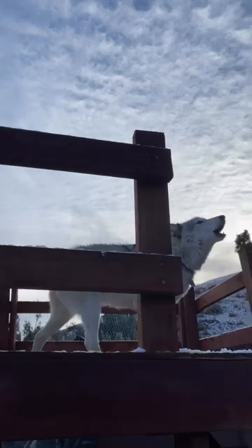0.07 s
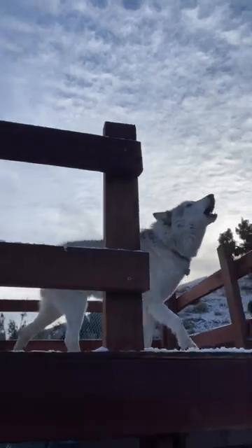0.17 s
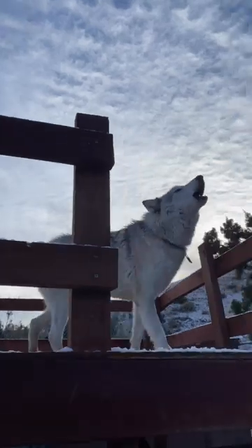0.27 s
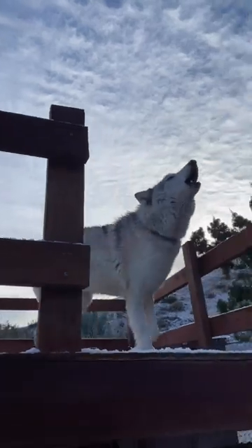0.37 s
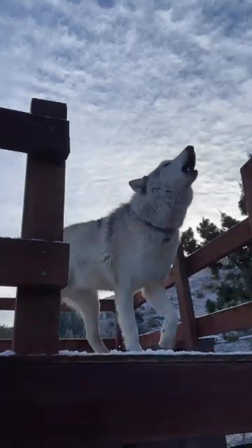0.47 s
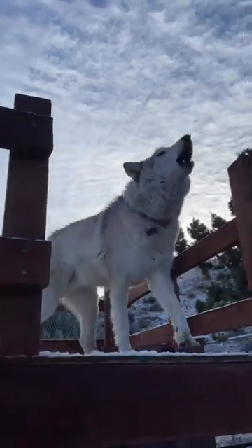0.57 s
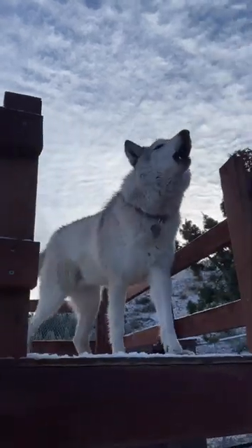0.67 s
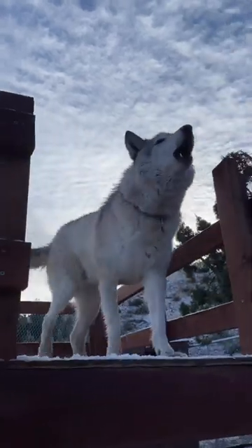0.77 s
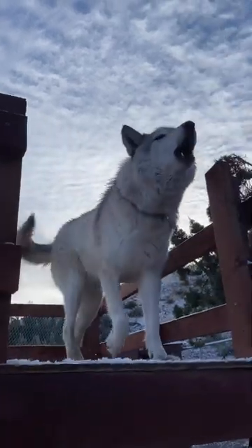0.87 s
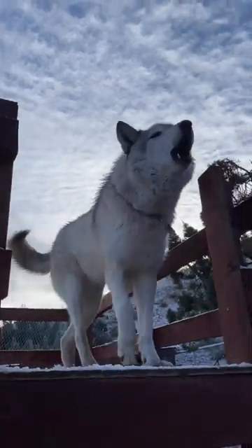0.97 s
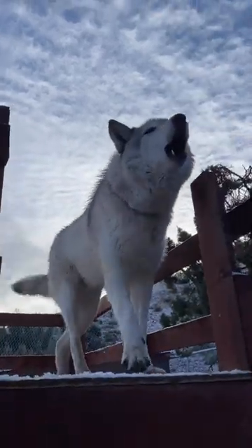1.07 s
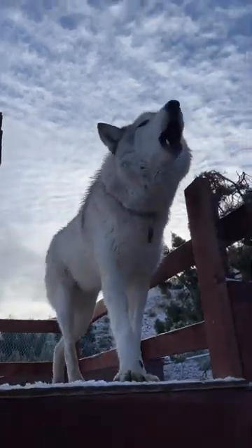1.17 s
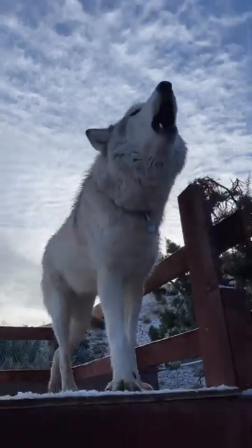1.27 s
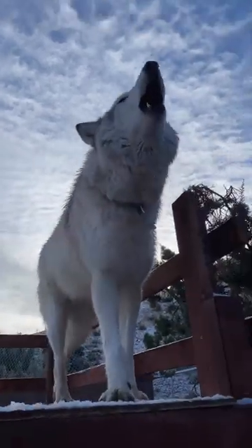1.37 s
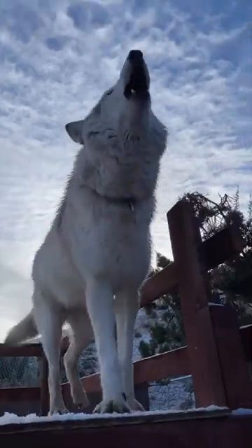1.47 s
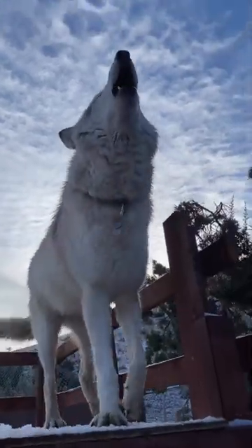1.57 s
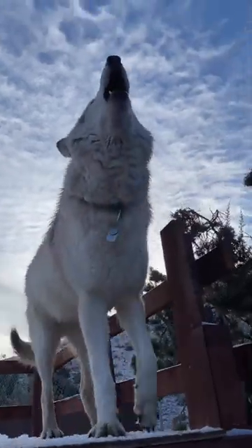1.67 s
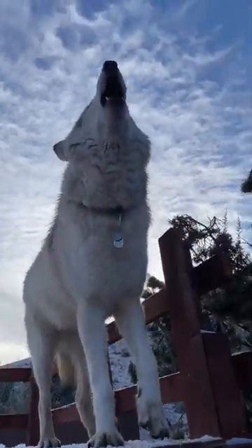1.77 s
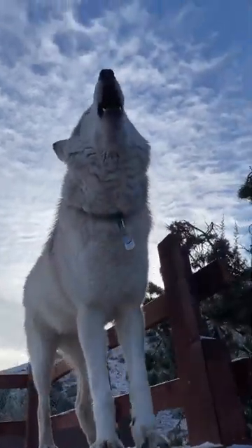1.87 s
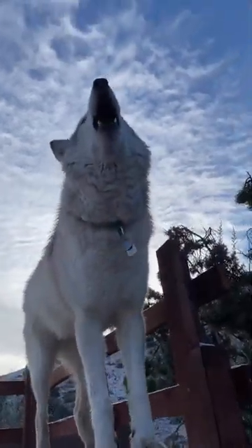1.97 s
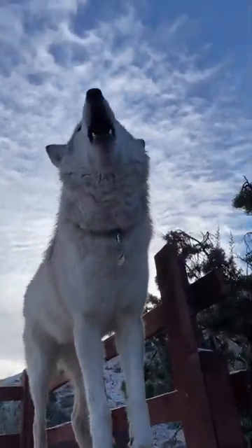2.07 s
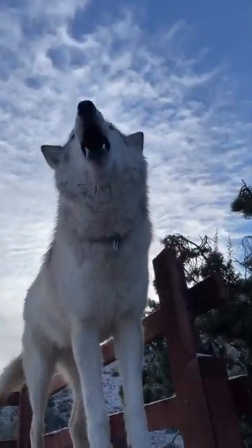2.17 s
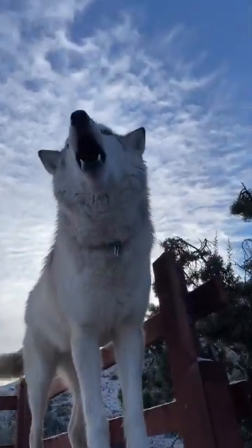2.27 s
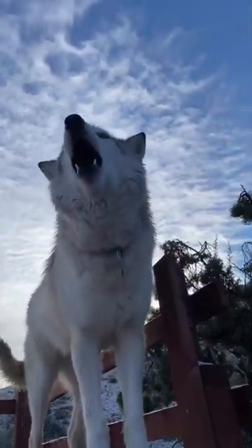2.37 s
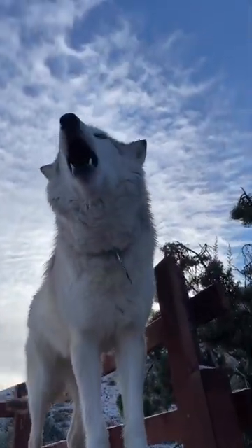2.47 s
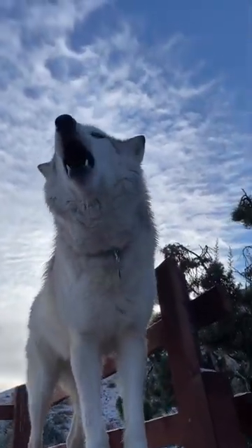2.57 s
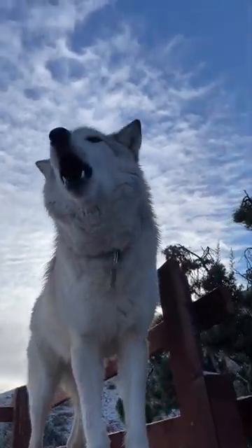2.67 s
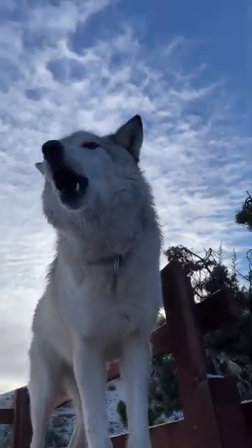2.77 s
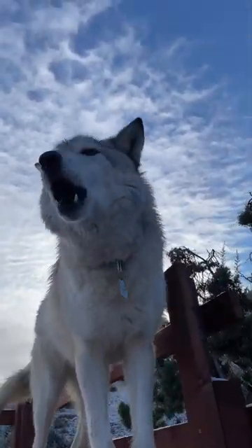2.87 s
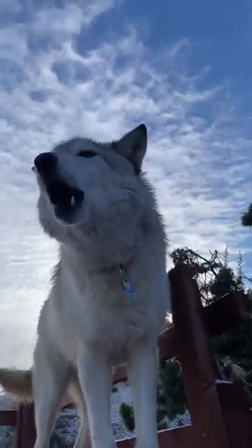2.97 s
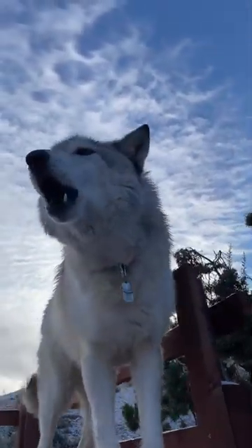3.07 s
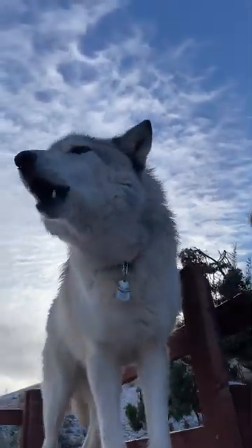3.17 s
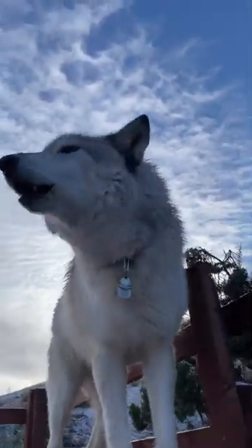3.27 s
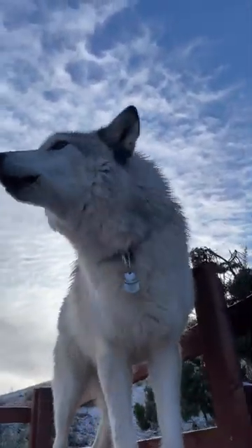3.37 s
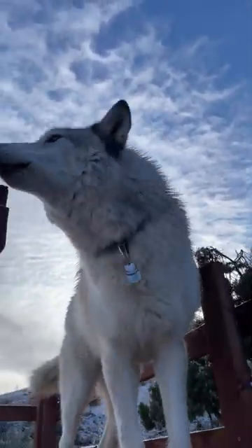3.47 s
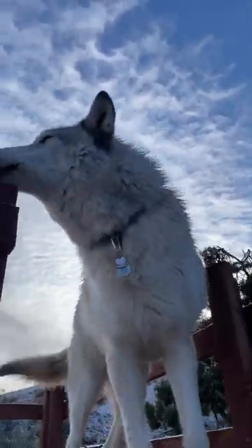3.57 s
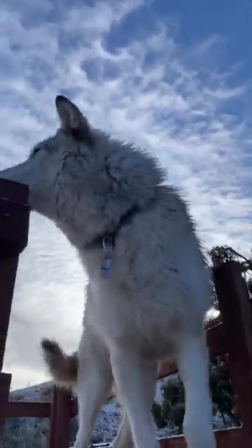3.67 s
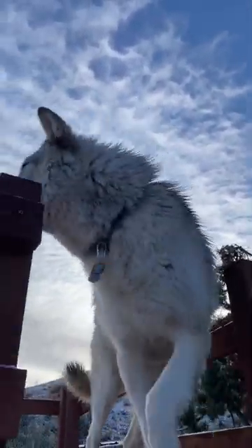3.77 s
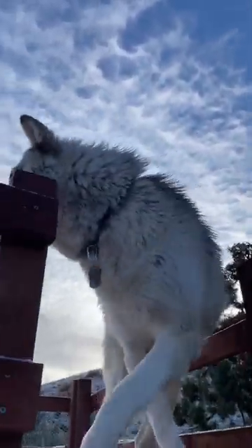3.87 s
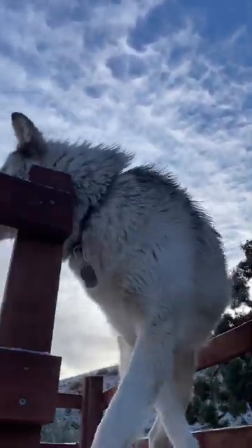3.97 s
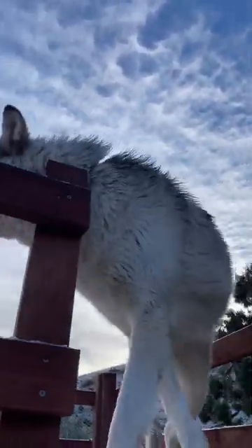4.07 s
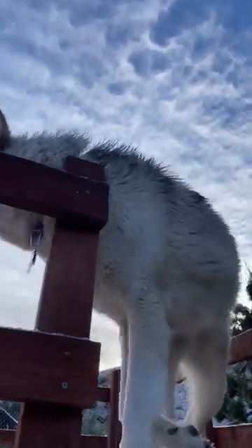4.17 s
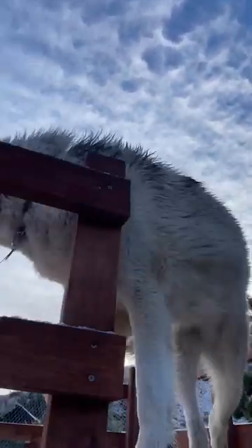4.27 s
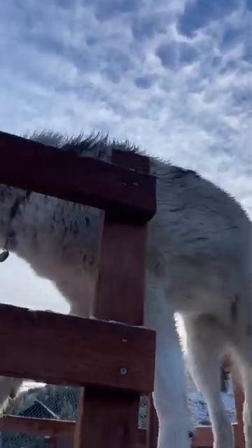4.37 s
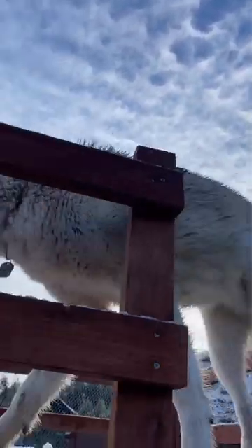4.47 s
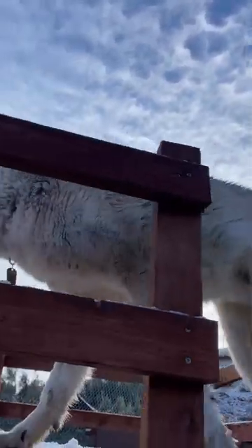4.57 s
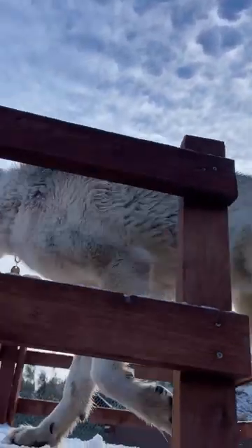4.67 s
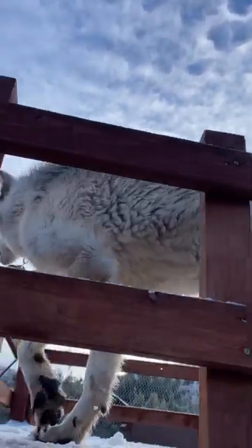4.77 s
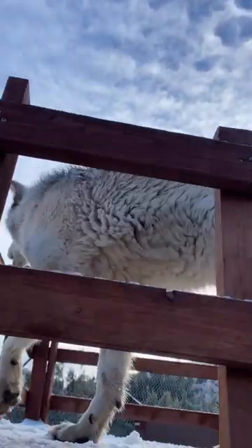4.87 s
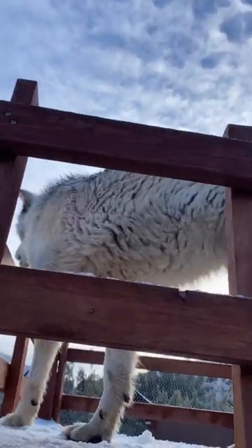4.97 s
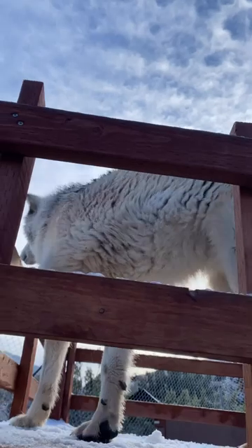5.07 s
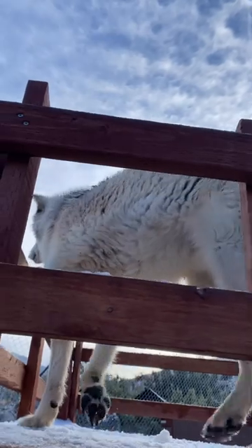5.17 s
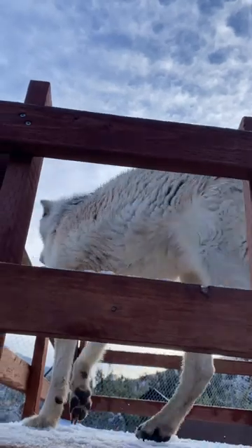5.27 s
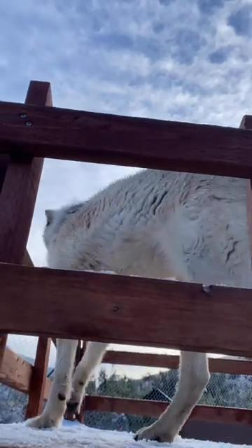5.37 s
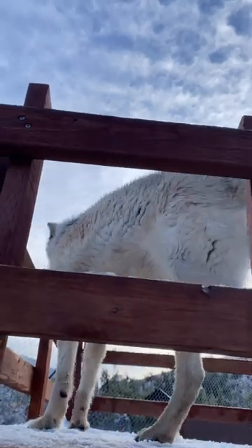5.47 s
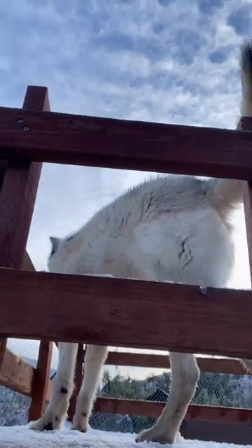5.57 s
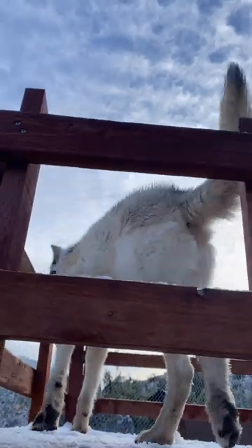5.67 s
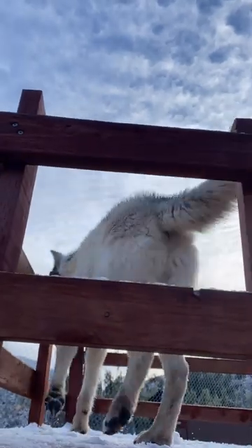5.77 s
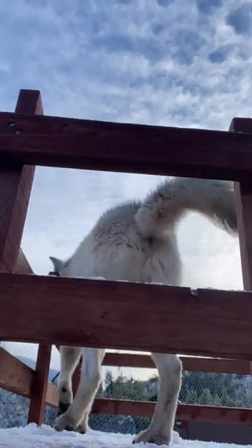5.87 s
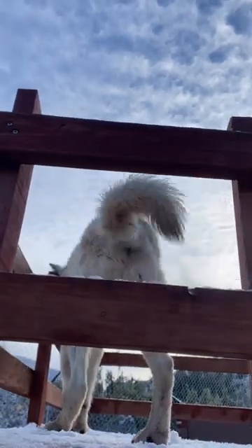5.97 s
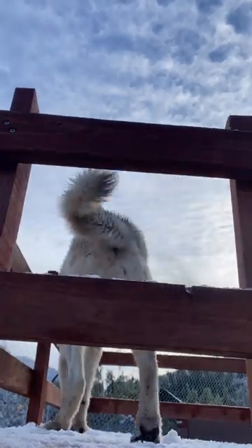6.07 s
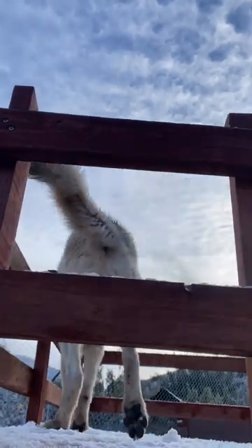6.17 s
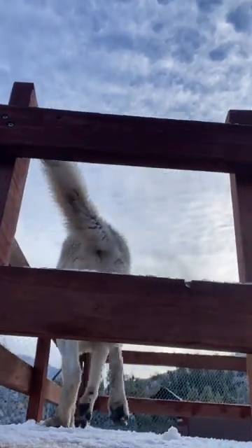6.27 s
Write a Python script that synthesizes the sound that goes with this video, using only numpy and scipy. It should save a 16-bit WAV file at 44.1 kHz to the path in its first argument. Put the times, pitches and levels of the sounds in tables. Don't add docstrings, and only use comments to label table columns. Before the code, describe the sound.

Outdoors in snow, a near wolf's full, ringing howl starts abruptly with a quick upward scoop and holds steady, breathy at the edges, over farther howls to the left. It sinks and thins out, leaving low wavering tones, light paw steps on a wooden deck and crisp snow. Then higher howls from the pack overlap and clash, growing to the cut-off. Handheld stereo pickup, very little echo, faint low wind.

```python
import sys
import numpy as np
from scipy import signal
from scipy.fft import rfft, irfft
from scipy.io import wavfile
from scipy.ndimage import uniform_filter1d

SR = 44100
rng = np.random.default_rng(int(sys.argv[2]) if len(sys.argv) > 2 else 0)


def unload_audio(sound):
    columns = np.transpose(np.atleast_2d(sound))
    steps = np.round(np.clip(columns, -1, 1) * 32767)
    wavfile.write(sys.argv[1], SR, steps.astype(np.int16))


def gain_from_decibels(decibels):
    exponent = np.asarray(decibels, float) / 20
    return 10 ** exponent


N = 279153
START_S = 0.151
PORT_LEAD_S = 6e-05


def in_time(rows, fade=0.0055):
    s, *columns = np.transpose(rows)
    first = int((s[0] - fade) * SR)
    t = np.arange(first, min(int((s[-1] + fade) * SR), N)) / SR
    end = s[-1] + fade if s[-1] < N / SR - 0.01 else np.inf
    gate = np.clip(np.minimum(t - t[0], end - t) / (2 * fade), 0, 1)
    return first, gate, [np.interp(t, s, c) for c in columns]


def follow(rows, t):
    return np.interp(t, *np.transpose(rows))


def at_hz(points, hz):
    p = np.array(points, float)
    return np.interp(np.log(hz), np.log(np.maximum(p[:, 0], 20)), p[:, 1])


def resonance(hz, centre_hz, width):
    return np.exp(-(np.log(hz / centre_hz) / width) ** 2)


def drift(rate, size=N):
    r = np.exp(-80 * np.pi * rate / SR)
    steps = rng.standard_normal(N // 40 + 2002)
    slow = signal.lfilter([1], [1, -2 * r, r * r], steps)[2000:]
    return np.interp(np.arange(size) / 40, np.arange(len(slow)), slow / slow.std())


def coloured(points, alike, lead_s=0):
    mid, side = rfft(rng.standard_normal((2, N)))
    hz = np.arange(len(mid)) * SR / N
    gain = gain_from_decibels(at_hz(points, np.maximum(hz, 1)))
    own = 1 - np.clip(alike, 0, 1)
    lead = np.exp(2j * np.pi * hz * lead_s)
    out = irfft(gain * np.array([lead * (mid + own * side), mid - own * side]), N)
    return out / out.std()


def patchy(x, depth_db, bins=3, frames=24):
    spectra = signal.stft(x, nperseg=1024)[2]
    field = rng.standard_normal(spectra.shape[1:])
    for width, axis in ((bins, 0), (frames, 1), (frames, 1)):
        field = uniform_filter1d(field, max(int(width), 1), axis=axis)
    gain = gain_from_decibels(depth_db * field / field.std())
    out = signal.istft(spectra * gain, nperseg=1024)[1][:, :N]
    return out / out.std()


def add(out, at, phase, level_db, pan_db, lead):
    height = np.sqrt(2) * gain_from_decibels(level_db)
    out[0, at:at + len(phase)] += height * 2 / (1 + gain_from_decibels(-pan_db)) * np.sin(phase + lead / 2)
    out[1, at:at + len(phase)] += height * 2 / (1 + gain_from_decibels(pan_db)) * np.sin(phase - lead / 2)


# time_s, pitch_hz, effort_db, jaw_db, lip_rounding_percent
HOLD = [(0.33, 384.2, -9.5, -1.5, -0.5), (0.46, 383.2, -9, 0.5, -0.5), (.6, 384.6, -9.5, 1.5, -0.5),
        (0.728, 383.6, -9, 3.5, -2), (0.861, 379.8, -8.5, -3.5, 0), (1, 382, -10.5, 0, 0),
        (1.14, 377.6, -12, 0.5, 0.1), (1.334, 380.6, -16, 5.5, 0), (1.562, 384.7, -12.5, 0.5, 0),
        (1.72, 388.3, -11.5, -3, 0), (1.9, 384.7, -11.5, 1.5, -0.5), (2.1, 382.3, -11, 1, 0.5),
        (2.36, 385.6, -10, -2, 3), (2.6, 382.9, -11.5, -4, 2), (2.801, 378.3, -15, -4.5, 1),
        (3.1, 370.9, -14, -2.5, -0.26)]
DROP = [(3.101, 368.2, -15, -2.5, 0.2), (3.2, 358.3, -16, -5, 0.22), (3.27, 339.7, -19.5, 1.5, 0.33),
        (3.37, 280.6, -28.5, 3.5, 0.28), (3.477, 246.5, -30.5, -9.5, 0.28), (3.54, 235.5, -38.5, -1, 0.44),
        (3.602, 247.3, -35.5, -8, 0.21), (3.66, 263.8, -34, -15.5, 0.23), (3.735, 259.6, -34.5, -0.5, 0.36)]
WAVER = [(3.79, 255.6, -39.5, -1, 0.3), (3.859, 245.5, -36.5, -10.5, 0.3), (3.95, 249.5, -35, -13, .27),
         (4.03, 253.6, -37, -17.5, 0.27), (4.081, 261.2, -37.5, -16, 0.22),
         (4.124, 280.5, -41, -15.5, 0.28), (4.15, 306.3, -43, -12, .28)]
STEP = [(4.15, 306.8, -48, -13, .28), (4.162, 343.5, -40.5, -15, 0.27), (4.206, 353.9, -39.5, -9, .3),
        (4.268, 348.8, -43, -15, .3), (4.31, 386.3, -45.5, -10, .3), (4.35, 405.5, -40.5, -11, .3),
        (4.4, 401, -44, -11, .3), (4.453, 393.5, -45.5, -14, 0.34), (4.511, 356.4, -67.5, -12, 0.22)]
RISE = [(4.961, 381.5, -56, -7, .3), (4.976, 369.1, -48, -17, .3), (5.0, 351.8, -48.5, -14, 0.32),
        (5.05, 344.5, -46.5, -20, .3), (5.104, 326.5, -51, -17, .3), (5.241, 347.1, -56, -15, .3),
        (5.321, 363.8, -53.5, -9, .3), (5.386, 392.2, -45.5, -8.5, 0.26), (5.522, 414.4, -43.5, -1, 0.24)]
CREST = [(5.522, 421, -40.5, -5, .27), (5.62, 462, -36.5, -1.5, .3), (5.684, 483.8, -34.5, -4.5, .3),
         (5.73, 517.4, -32.5, -5.5, 0.34), (5.78, 517.3, -32, -7.5, .3), (5.851, 498.2, -40, 4.5, .3),
         (5.946, 468.2, -37.5, -2, .28), (5.98, 472, -46, 3, .3), (6.043, 488, -42.5, 9.5, .3)]
LAST = [(6.04, 474.5, -39, -5, 0.24), (6.082, 460, -44, 7, .3), (6.33, 443.4, -44, 10, 0.7)]
# freq_hz, level_db
MOUTH_WIDE = [(380, 0), (710, -5.5), (790, -34.5), (1065, -33), (1135, -19.5), (1160, -17), (1515, -14),
              (1550, -17.5)]
MOUTH_CLOSING = [(240, -6), (285, 2.5), (360, 8), (500, -5), (570, -8.5), (700, -7), (800, -10.5),
                 (1000, -20.5)]
MOUTH_SHUT = [(245, -14.5), (265, -3.5), (350, 5), (500, -1.5), (700, 3), (800, -4), (1000, 2.5)]
MOUTH_AWAY = [(340, 5), (500, -1.5), (700, 0.5), (1000, -5.5), (1300, -7.5), (1500, -5), (1900, -16)]
# freq_hz, level_db
THROAT_WIDE = [(1550, 1.5), (1950, -7), (2300, -15), (2700, -34.5), (3070, -56), (3450, -40.5), (4200, -49),
               (4950, -52.5), (5400, -43.5), (6200, -40), (7000, -45), (7600, -68.5), (8800, -55.5),
               (9600, -77), (11000, -54), (15000, -63.5)]
THROAT_CLOSING = [(1000, 5), (1280, -2.5), (1500, -18), (1850, -7), (2050, 4.5), (2300, -24.5),
                  (3000, -77.5)]
THROAT_SHUT = [(1000, 18.5), (1300, 11.5), (1600, 1), (2000, -1), (2350, -8.5), (2900, -46), (3200, -60),
               (4000, -62)]
THROAT_AWAY = [(1900, 11.5), (2350, -4), (2600, -11), (2900, -18), (3200, -37)]
POSTURE_S = [3.24, 3.36, 3.58, 3.68, 4.7, 4.8]
# time_s, level_db
NOSE = [(.3, 0), (2.2, -.5), (2.4, -2), (2.62, -1), (2.8, 5), (3.0, 0.5), (3.15, -0.5), (3.35, 0),
        (3.6, 0.5)]
TONGUE = [(.15, 2), (.42, -8.5), (.58, -0.5), (.75, -4), (.95, -7), (1.2, -4), (1.45, 3.5), (2.0, -3.5),
          (2.6, 0.5), (2.9, 3.5), (3.12, 2.5), (3.24, -5), (3.33, 12), (3.48, 16.5), (3.56, -19),
          (3.66, -2.5), (5.76, 2), (5.87, 7), (5.97, 8)]
CHEEKS = [(.3, 0), (.5, 0.5), (.8, -4), (1.05, 4), (1.33, -3), (1.45, 1.5), (1.75, 3.5), (1.9, -3),
          (3.2, 0), (3.42, -3), (3.62, -21), (3.75, 6.5), (5.6, -5), (5.75, 7.5), (5.87, 2.5), (5.97, -6)]
PALATE = [(3.2, -2.5), (3.27, 11.5), (3.32, -3), (3.38, 10.5), (3.5, 10), (3.62, 0)]
# time_s, towards_left_db
HEAD = [(.15, 0), (.9, -1.2), (1.3, 0), (1.5, -0.5), (2.5, -1.05), (3.2, -0.1), (3.7, .8), (6.3, -0.2)]
# freq_hz, left_minus_right_db
NEAR_PAN = [(60, 0.0), (110, 0.0), (210, 1), (390, 2.5), (740, 5.5), (1390, 3), (2600, -2)]
# freq_hz, lead_rad
NEAR_PHASE = [(0, 0.2), (860, 0.22), (2300, 0.32), (4000, 1.5), (7000, 0.63)]


def near_wolf(count=24, jitter_hz=0.39, shimmer_db=0.16, sway_db=1.34, high_shimmer_db=4.5):
    scoop_s, scoop_hz, overshoot_hz = 0.065, 33.25, 4.7
    swell_db, start_shut_db, shut_db = 8, 23, 16
    glide_s = 0.02
    jaw_from_hz, jaw_full_hz = 580, 1490
    lip_hz, cheek_hz, lip_width = 1875, 1530, 0.026
    lip_db, cheek_db = 8, 0.7
    nasal_top_hz = 915
    even_db, even_s = 13, 0.1
    rise_rough = 1.2
    pause_db = 23.5
    tracts = [(MOUTH_WIDE, THROAT_WIDE), (MOUTH_CLOSING, THROAT_CLOSING),
              (MOUTH_SHUT, THROAT_SHUT), (MOUTH_AWAY, THROAT_AWAY)]
    cavities = [(NOSE, 830, 0.12), (TONGUE, 1100, 0.11), (CHEEKS, 1520, 0.06), (PALATE, 1954, 0.02)]

    out, turns = np.zeros((2, N)), rng.uniform(0, 2 * np.pi, count + 1)
    _, held_hz, held_db, jaw, lips = HOLD[0]
    attack = [(START_S, held_hz - scoop_hz, held_db - swell_db, jaw - start_shut_db, -lips),
              (START_S + scoop_s, held_hz + overshoot_hz, held_db - swell_db, jaw - shut_db, lips)]
    howl = attack + HOLD
    phrases = [howl, DROP, DROP[-1:] + WAVER, STEP, RISE, CREST, LAST]
    s, pitch, effort, opening, _ = np.transpose(sum(phrases, []))
    t = np.arange(N) / SR
    glided_hz = uniform_filter1d(np.interp(t, s, pitch), max(int(glide_s * SR), 1))
    cycle = 2 * np.pi * np.cumsum(glided_hz + jitter_hz * drift(67)) / SR
    posture = np.interp(t, POSTURE_S, [0, 1, 1, 2, 2, 3])

    for rows in phrases:
        at, gate, (hz, effort_db, jaw_db, rounding) = in_time(rows, fade=0.0076)
        gate_db = 20 * np.log10(gate + 1e-5)
        size, now = len(hz), t[at:at + len(hz)]
        shares = [(np.clip(1 - abs(posture[at:at + size] - i), 0, 1), *tract)
                  for i, tract in enumerate(tracts)]
        shares = [part for part in shares if part[0].any()]
        rising = rows is RISE or rows is CREST
        curves = [(follow(curve, now), centre_hz, width) for curve, centre_hz, width in cavities]
        head_db = follow(HEAD, now)
        top_hz = max(throat[-1][0] for _, _, throat in shares)
        for k in range(1, min(count, int(top_hz / hz.min())) + 1):
            mean_hz = k * hz.mean()
            wobble = drift(25, size) * shimmer_db
            if k > 1:
                rough = 1
                if rising:
                    rough = 1 + rise_rough if k < 7 else 0.5
                depth_db = high_shimmer_db if k >= 7 and rows is howl else sway_db
                wobble = wobble + drift(14.0 if rising else 2.5, size) * rough * depth_db
            seen_hz = k * hz * (1 + (mean_hz < nasal_top_hz) * rounding / 100)
            tract_db = sum(share * (at_hz(mouth, seen_hz) + at_hz(throat, seen_hz) - throat[0][1])
                           for share, mouth, throat in shares)
            lifted = np.clip(np.log(k * hz / jaw_from_hz) / np.log(jaw_full_hz / jaw_from_hz), 0, 1)
            ring_db = lip_db * rounding * resonance(k * hz, lip_hz, lip_width)
            ring_db = ring_db + cheek_db * rounding * resonance(k * hz, cheek_hz, lip_width)
            cavity_db = sum(db * resonance(k * hz, centre_hz, width) for db, centre_hz, width in curves
                            if 0.7 < mean_hz / centre_hz < 1.4)
            onset_db = 0
            if k % 2 == 0 and k < 8:
                onset_db = lifted * k / 4 * even_db * np.exp(-(now - START_S) / even_s)
            level_db = effort_db + lifted * jaw_db + ring_db + tract_db + onset_db + cavity_db
            add(out, at, k * cycle[at:at + size] + turns[k], level_db + wobble + gate_db,
                at_hz(NEAR_PAN, mean_hz) + head_db, at_hz(NEAR_PHASE, mean_hz))
    pause = (t > STEP[-1][0]) & (t < RISE[0][0])
    return out, cycle, np.interp(t, s, effort + opening) - pause_db * pause


# freq_hz, level_db_per_hz
HISS = [(1900, -58), (2700, 4.5), (3400, -4.5), (4300, -5.5), (5400, -5.5), (6600, -3), (7500, -7),
        (8600, -19), (9600, -30), (10800, -17.5), (14000, -20), (15500, -42.5)]
# freq_hz, level_db_per_hz
HUSK = [(120, -61.5), (300, -18), (450, -0.5), (680, 3), (950, -16.5), (1400, -5), (1800, -10), (2300, -11),
        (2800, -14.5), (3050, -36)]
# time_s, level_db
HOARSE = [(.15, -1.5), (.7, -4), (1.2, 0), (1.6, -2.5), (1.8, -6.5), (2.4, -3), (2.999, -4), (3.3, 0),
          (4.0, -5), (5.3, -8.5), (6.3, -3.5)]


def breath(cycle, blow_db, gating=0.33):
    hiss_db, hiss_follows = -47, 0.34
    husk_db, husk_follows = -38.5, 0.29
    closed_clear_db = 7
    t = np.arange(N) / SR
    hiss = patchy(coloured(HISS, alike=0.59, lead_s=PORT_LEAD_S), depth_db=4.5)
    husk = patchy(coloured(HUSK, alike=0.56), depth_db=5.5)
    blow_db = blow_db - 2 * closed_clear_db * np.interp(t, POSTURE_S[:2], [0, 1])
    air = gain_from_decibels(hiss_db + hiss_follows * blow_db) * hiss
    air = air + gain_from_decibels(husk_db + husk_follows * blow_db + follow(HOARSE, t)) * husk
    puffs = air * (1 + np.clip(gating, 0, 1) * np.cos(cycle))
    return signal.sosfilt(signal.butter(4, 260, "high", fs=SR, output="sos"), puffs)


# time_s, pitch_hz, level_db
SECOND = [(0.15, 346.2, -20.5), (0.26, 354.4, -19), (0.36, 346, -21), (0.9, 346.4, -27),
          (1.6, 330.6, -34.5), (2.4, 324.5, -37.5), (3.1, 311.5, -43), (3.56, 292.2, -41), (3.74, 282, -48)]
PUP = [(0.17, 870, -56), (0.24, 882, -35), (0.36, 832, -40.5), (0.6, 843, -53), (0.75, 794, -42.5),
       (1.15, 800, -54.5)]
FAR_LOW = [(0.25, 227, -55.5), (0.85, 230.8, -44.5), (1.3, 225.6, -57)]
MOAN = [(3.7, 176, -60), (3.802, 168, -55), (4.944, 168.5, -52), (5.008, 171.4, -56), (5.07, 192, -65)]
YODEL = [(3.94, 563, -51), (4.1, 577, -44), (4.44, 618, -34.5), (4.76, 595, -37), (5.16, 577.4, -46.5),
         (5.32, 579, -45), (5.56, 594, -38.5), (5.95, 593, -36), (6.33, 585, -32)]
HIGH = [(5.326, 658, -37.5), (5.345, 673, -40.5), (5.5, 712.7, -40.5), (5.7, 713, -43.5),
        (5.88, 707.7, -38.5), (6.02, 684, -34.5), (6.12, 709.5, -36), (6.33, 712, -37)]
GROWL = [(5.87, 126, -56), (5.93, 139.7, -50), (5.97, 162.6, -41), (6.005, 200, -40.5), (6.04, 262.6, -40)]
BREAK = [(6.035, 380.9, -23), (6.096, 462.8, -22), (6.33, 467.6, -19.5)]
# time_s, pitch_hz, level_db
WHINES = [
    [(5.08, 386.9, -74), (5.24, 429.3, -62), (5.38, 434.0, -58)],
    [(5.38, 850, -61), (5.46, 1063.9, -48), (5.52, 1138, -50), (5.6, 1085, -52), (5.68, 965.6, -55),
     (5.76, 770, -52)],
    [(4.5, 442, -108), (4.65, 415, -62), (4.85, 373.3, -63)],
    [(5.88, 1190, -61), (6.0, 1160, -58), (6.15, 1140, -62), (6.33, 1150, -63)],
]
# time_s, pitch_hz, level_db
DRONES = [
    [(.55, 112.8, -67.5), (.9, 115.3, -59), (1.3, 114.2, -67.5)],
    [(1.4, 133.9, -71), (1.9, 134, -69), (2.2, 133, -69)],
]
# phrase, partials_db, left_minus_right_db, left_lead_s
PACK = [(SECOND, [0.5, -20, -28, -40], 2.3, 0.00033), (PUP, [0], 9.9, 0.00013),
         (FAR_LOW, [-6.5, -1.5, -9, 2], 4.3, 0.00029),
        (MOAN, [-1, 6, -13.5, -21, -11, -29.5, -34, -26, -37, -34, -37, -28.5, -43.5, -30.5, -37.5, -24],
        4.4, 0.0002), (YODEL, [0, -41, -42.5], 7.3, 0.00014), (HIGH, [3, -18.5, -37, -39.5, -40, -25.5],
        9.4, 0.00034), (WHINES[0], [0, -10, -11], 6.6, .0001), (WHINES[1], [0], 4.55, .0001), (WHINES[2],
        [0, -32, -15], 4.0, .0001), (WHINES[3], [0], 4.0, .0001), (GROWL, [-5.5, 5, -5, -18, -32],
        4.9, 0.00011), (BREAK, [-3, -23, -34, -41, -44, -45], 9.4, 0.000086)]
# start_s, length_s, jump_hz
FLIPS = [
    (5.679, .04, 37.3),
    (5.818, .04, 47.9),
    (5.97, .5, 84.2),
]


def pack(jitter=0.0015, shimmer_db=0.9, high_shimmer_db=4.0):
    flip_edge_s = 0.015
    turn_s, facing_s, turn_db_per_s = 5.68, 0.19, 87
    beam_hz = 3004
    opening_db_per_s = 3
    settle_s, settle_db = 0.12, 5
    rasp_db, rasp_per_s, rasp_jitter = 5, 45, 0.012
    out = np.zeros((2, N))
    for rows, partials_db, pan_db, lead_s in PACK + [(drone, [0], 2.5, 0) for drone in DRONES]:
        at, gate, (hz, level_db) = in_time(rows)
        size = len(hz)
        t = (at + np.arange(size)) / SR
        hoarse = rows == WHINES[1]
        if rows == YODEL:
            for s, length_s, jump_hz in FLIPS:
                inside_s = np.minimum(t - s, s + length_s - t)
                hz = hz + jump_hz * np.clip(inside_s / flip_edge_s + 0.5, 0, 1)
        unsteady = (rasp_jitter if hoarse else jitter) * drift(30, size)
        phase = 2 * np.pi * np.cumsum(hz * (1 + unsteady)) / SR
        level_db = level_db + 20 * np.log10(gate + 1e-4)
        if hoarse:
            level_db = level_db - 4.0 + rasp_db * drift(rasp_per_s, size)
        for k, db in enumerate(partials_db, 1):
            if k * hz.mean() > beam_hz:
                db = db - turn_db_per_s * np.maximum(abs(t - turn_s) - facing_s, 0)
                db = db + high_shimmer_db * drift(15, size)
            if rows == SECOND and k == 3:
                db = db + opening_db_per_s * (t - t[0])
            if rows == BREAK and k > 1:
                db = db - settle_db * np.clip(1 - (t - t[0]) / settle_s, 0, 1)
            add(out, at, k * phase + k * k, level_db + db + shimmer_db * drift(18.0, size),
                pan_db, 2 * np.pi * k * hz * lead_s)
    return out


# freq_hz, level_db_per_hz
WIND = [(200, 0), (500, -0.5), (900, -7), (1500, -15), (2500, -27.5), (5000, -19.5), (8500, -24.5),
        (14000, -41.5)]
# time_s, level_db
RUMBLE = [(0.15, -53), (0.3, -52), (1.2, -58.5), (1.9, -75.5), (2.46, -73), (2.64, -63), (3.6, -69.5),
          (6.23, -65), (6.33, -67)]


def wind():
    at, gate, (gust_db,) = in_time(RUMBLE)
    gust = np.zeros(N)
    gust[at:at + len(gate)] = gain_from_decibels(gust_db - 1.0)
    lump_spectrum = [(22, -30), (45, -0.5), (70, -9.5), (130, -2.5), (220, -13), (400, -34.5), (900, -83.5)]
    lumps = coloured(lump_spectrum, alike=0.46) * gain_from_decibels(np.array([[0.7], [-0.7]]))
    gusts = gust * gain_from_decibels(1.5 * drift(2.2) + 2.5 * drift(7.3)) * lumps
    floor = patchy(coloured(WIND, alike=0.55, lead_s=PORT_LEAD_S), depth_db=5.5)
    return gusts + gain_from_decibels(-63.5) * floor * gain_from_decibels(1.5 * drift(1.6))


# time_s, pitch_hz, level_db
WHISTLES = [
    [(.155, 4170, -58.5), (.21, 4220, -56), (.28, 4290, -55.5), (.34, 4270, -85.5)],
    [(5.66, 5330, -82), (5.78, 5200, -63.5), (5.89, 5263, -63), (5.96, 5370, -67), (6.04, 5240, -73.5),
     (6.2, 5310, -76.5)],
]
WHISTLE_SIDES_DB = [-4, 3.5, 4.5, -1]


def whistles(flutter_db=3.0, wander_hz=9.3, beat_hz=507):
    out = np.zeros((2, N))
    for rows, sides_db in zip(WHISTLES, ([-40, 0], WHISTLE_SIDES_DB)):
        at, gate, (hz, level_db) = in_time(rows)
        gate_db = 20 * np.log10(gate + 1e-4)
        for k, db in enumerate(sides_db, -1):
            tone_hz = hz + k * beat_hz + wander_hz * drift(18, len(hz))
            phase = 2 * np.pi * np.cumsum(tone_hz) / SR
            tone_db = level_db + db + flutter_db * drift(25, len(hz)) + gate_db
            add(out, at, phase, tone_db, 1.0, 2 * np.pi * tone_hz * PORT_LEAD_S)
    return out


# start_s, peak_db
THUDS = [(.445, -51), (1.039, -50.5), (1.355, -57), (1.587, -57), (2.559, -58), (2.695, -61), (3.231, -54),
         (3.57, -52), (3.95, -53), (4.183, -49), (4.464, -53), (4.721, -54.5), (4.847, -48), (5.087, -54),
         (5.3, -51), (5.421, -57), (5.622, -43), (5.956, -55), (6.147, -52)]
# start_s, peak_db, length_s
CRUNCH = [(0.8443, -49.5, 0.057), (1.092, -42, .022), (1.8215, -48, 0.022), (3.419, -64.5, 0.034),
          (3.922, -48, .05), (4.101, -58, .04), (4.143, -54.5, 0.063), (4.435, -50, 0.041),
          (4.753, -63.5, 0.023), (4.788, -58, 0.054), (4.9604, -57, .05), (5.041, -62, .05),
          (5.293, -56.5, .05), (5.599, -57.5, .08), (5.837, -55.5, .02)]


def paws(per_s=3000, shared=0.52, deck_hz=68, deck_t60=0.2):
    t, burst, knock = np.arange(N) / SR, np.zeros(N), np.zeros(N)
    ragged = gain_from_decibels(3.6 * drift(60))
    for s, db, crunch_s in CRUNCH:
        age = np.maximum(t - s, 0) / crunch_s
        burst += gain_from_decibels(db + 2.0) * (t > s) * np.exp(-age ** 3) * ragged
    grains = (rng.random((2, N)) < per_s / SR) * rng.laplace(0, 1, (2, N))
    crisp = signal.butter(1, [1800, 11000], "band", fs=SR, output="sos")
    snow = signal.sosfilt(crisp, (grains + shared * grains[::-1]) * burst)
    for s, db in THUDS:
        knock[int(s * SR)] = gain_from_decibels(db + 1.5)
    soft = signal.lfilter([0.01], [1, -0.99], knock + 1e-18)
    r, w = gain_from_decibels(-60 / (deck_t60 * SR)), 2 * np.pi * deck_hz / SR
    thud = signal.lfilter([0, np.sin(w)], [1, -2 * r * np.cos(w), r * r], soft)
    return snow + thud * gain_from_decibels(np.array([[1.0], [-1.0]]))


# start_s, level_db, length_s
CRACKS = [
    (6.0, -58, .05),
    (4.966, -63.5, .012),
]


def cracks(low_hz=1300, high_hz=2750):
    t = np.arange(N) / SR
    spill = sum(gain_from_decibels(db) * np.exp(-((t - s) / length_s - 0.5) ** 2 * 4) for s, db, length_s in CRACKS)
    band = signal.butter(3, [low_hz, high_hz], "band", fs=SR, output="sos")
    noise = signal.sosfilt(band, rng.standard_normal(N))
    return spill * noise / noise.std() * gain_from_decibels(np.array([[1.5], [-1.5]]))


# delay_s, level_db
ECHOES = [(0.022, -33), (0.047, -48.5), (0.084, -36.5), (.16, -42)]


def outdoors(x, dull_hz=1500):
    dull = signal.sosfilt(signal.butter(1, dull_hz, fs=SR, output="sos"), x)
    out = np.zeros_like(x)
    for s, db in ECHOES:
        for side, stretch in enumerate((1, 1.13)):
            lag = int(s * stretch * SR)
            out[side, lag:] += gain_from_decibels(db) * dull[side, :-lag]
    return out


# freq_hz, level_db
FAINT_COLOUR = [(2000, 0), (3100, -8), (4200, 1.5), (6600, -3), (7500, -17), (8400, 4), (10000, -14.5),
                (11500, -1)]


def colour_faint(x):
    hz = np.maximum(np.arange(N // 2 + 1) * SR / N, 1)
    return irfft(rfft(x) * gain_from_decibels(at_hz(FAINT_COLOUR, hz)), N)


def scene():
    near, cycle, blow_db = near_wolf()
    voices = near + pack() + whistles() + cracks()
    return voices + outdoors(voices) + breath(cycle, blow_db) + colour_faint(paws() + wind())


# freq_hz, width_hz, level_db
DEAD_BANDS = [
    (2917, 170, -9.5),
    (7700, 110, -21.5),
    (9850, 140, -22.5),
]


def thin_bands(x, bins=3, frames=9, around=25):
    under_limit_db, edge_db, cut_db, from_hz = -2.5, 1.1, -16, 2950
    hz, _, spectra = signal.stft(x, SR, nperseg=1024)
    power = np.sum(abs(spectra) ** 2, 0) + 1e-20
    power = uniform_filter1d(power, max(int(frames), 1), axis=1)
    near, wide = (uniform_filter1d(power, max(int(width), 1), axis=0) for width in (bins, around))
    under_db = 10 * np.log10(np.maximum(near, 1e-22) / np.maximum(wide, 1e-22)) - under_limit_db
    shut = 0.5 - 0.5 * np.tanh(under_db / edge_db)
    dead_db = sum(db * np.exp(-((hz - centre_hz) / width_hz) ** 2) for centre_hz, width_hz, db in DEAD_BANDS)
    gain = gain_from_decibels(cut_db * shut * (hz[:, None] > from_hz) + dead_db[:, None])
    return signal.istft(spectra * gain, SR, nperseg=1024)[1][:, :N]


def roll_off(x):
    return signal.sosfilt(signal.butter(12, 15700, fs=SR, output="sos"), x)


# freq_hz, level_db
WHINE = [
    (7962, -76),
    (8726, -78),
]
# start_s, step_db, recovery_s
DUCKS = [
    (0.383, -2.5, 0.16),
    (0.788, -3, 0.17),
]


def record(dry):
    t = np.arange(N) / SR
    whine = sum(np.sqrt(2) * gain_from_decibels(db + 1.8 * drift(3)) * np.sin(2 * np.pi * hz * t) for hz, db in WHINE)
    whine = whine * np.clip((3.3 - t) / 0.3, 0, 1)
    cut_db = np.zeros(N)
    for s, db, recovery_s in DUCKS:
        cut_db += db * np.clip((t - s) / 0.0016, 0, 1) * np.exp(-np.maximum(t - s, 0) / recovery_s)
    opened = np.clip((t - START_S) / 0.00044, 0, 1)
    return roll_off((thin_bands(dry) + whine) * gain_from_decibels(cut_db) * opened)


dry = scene()
out = record(dry)
unload_audio(out)
```